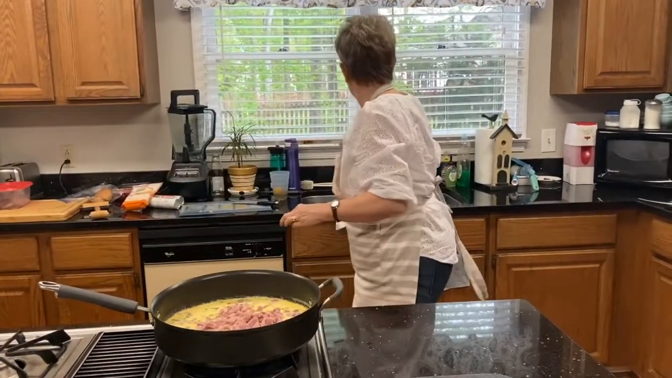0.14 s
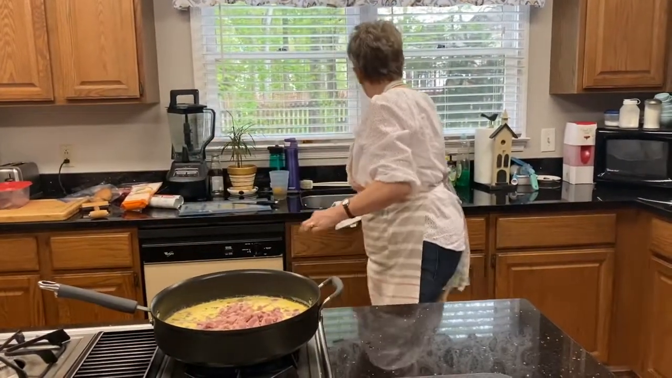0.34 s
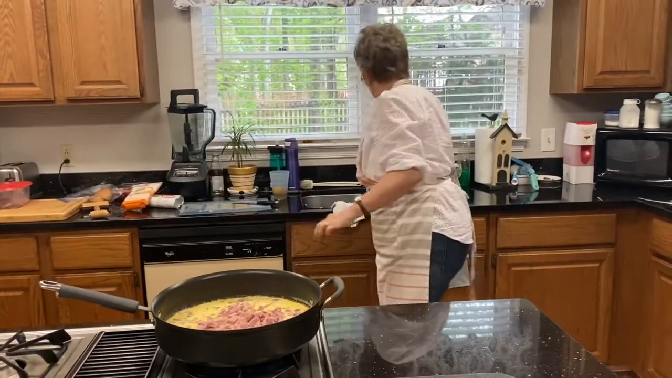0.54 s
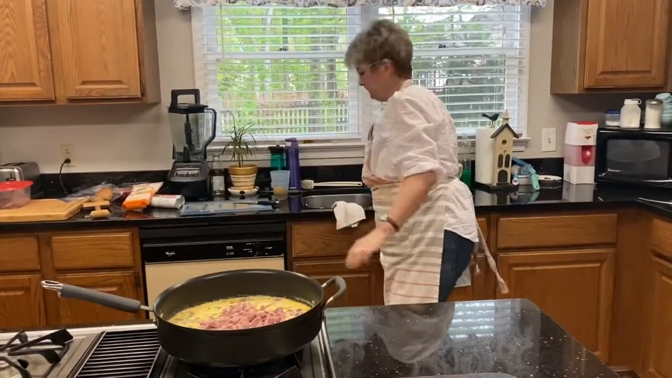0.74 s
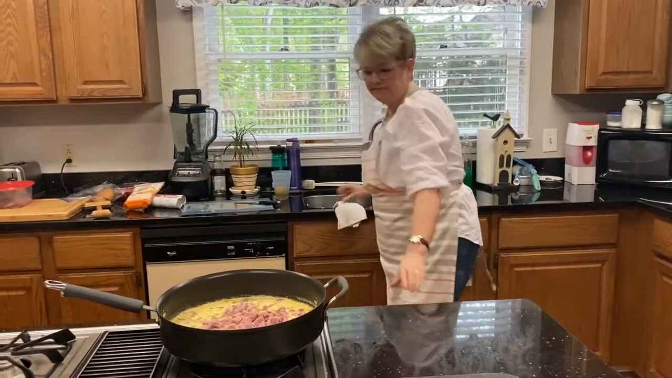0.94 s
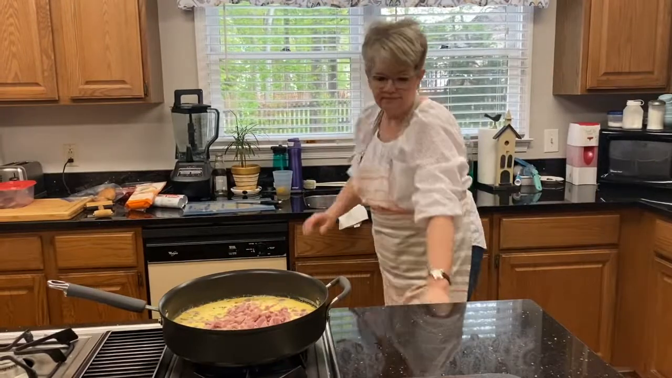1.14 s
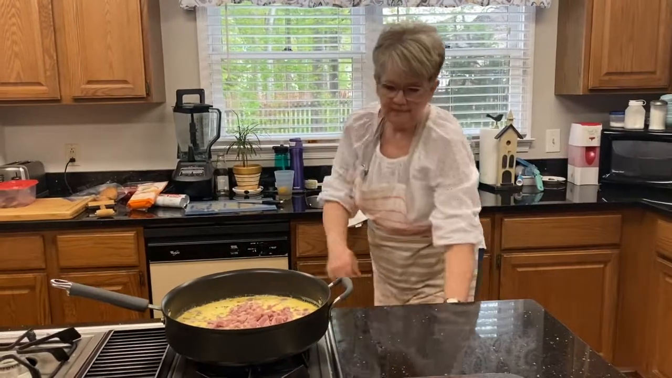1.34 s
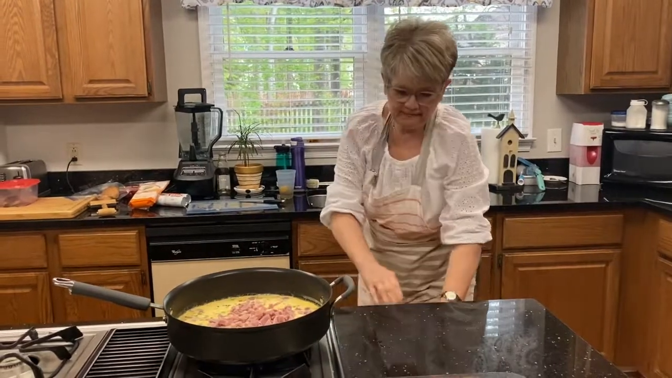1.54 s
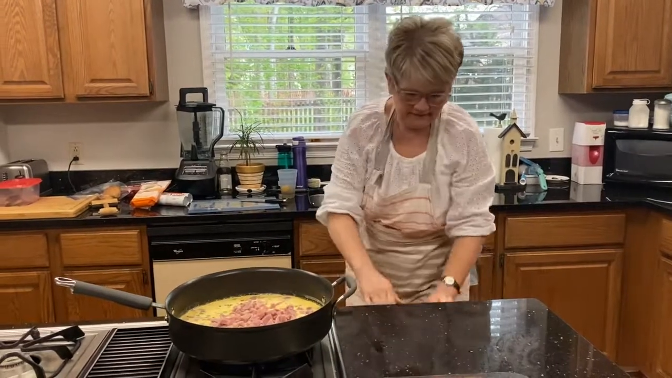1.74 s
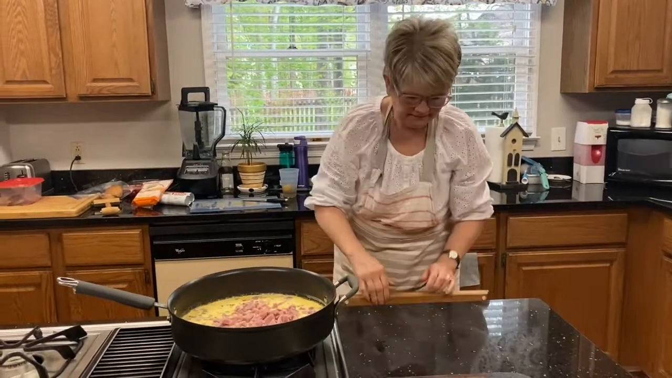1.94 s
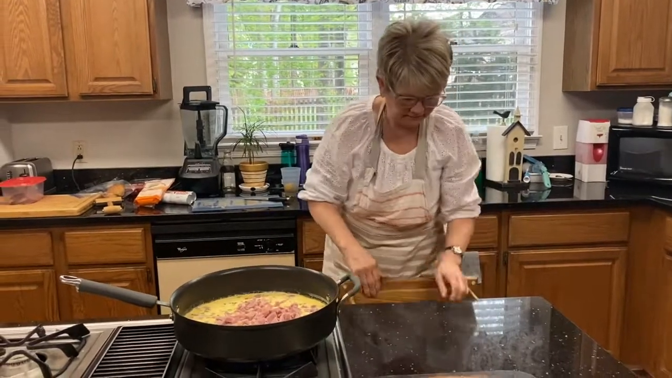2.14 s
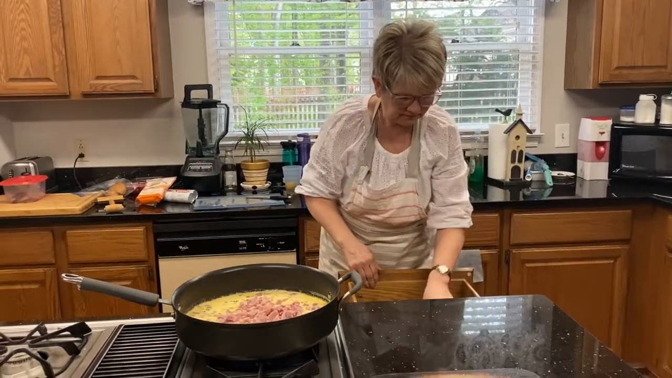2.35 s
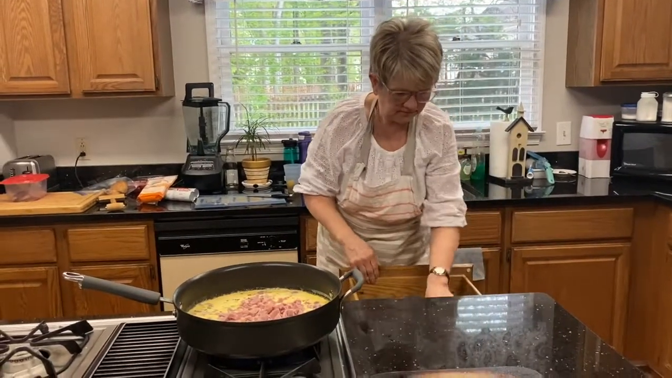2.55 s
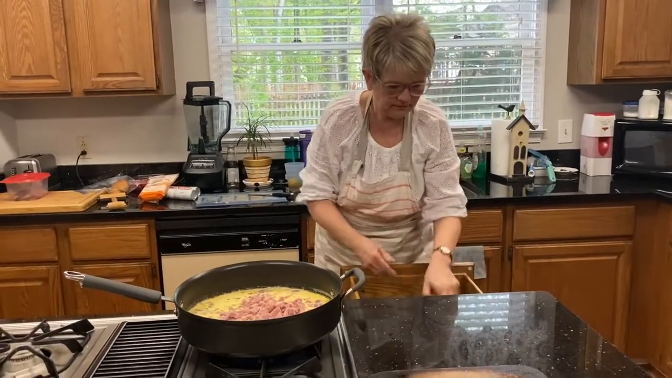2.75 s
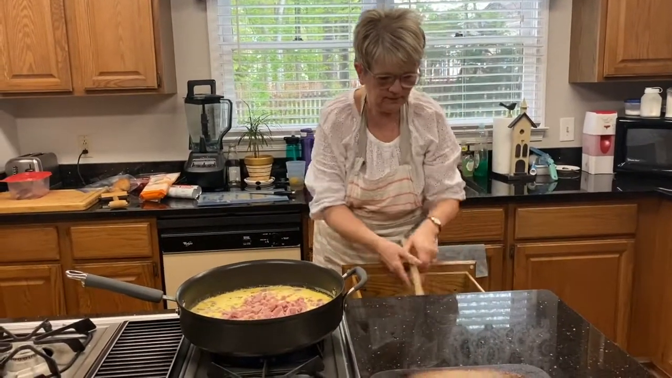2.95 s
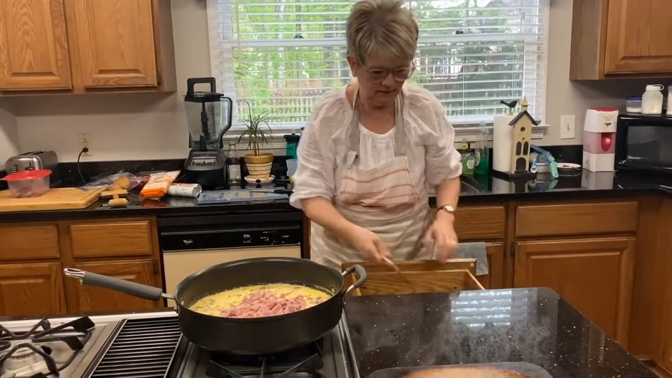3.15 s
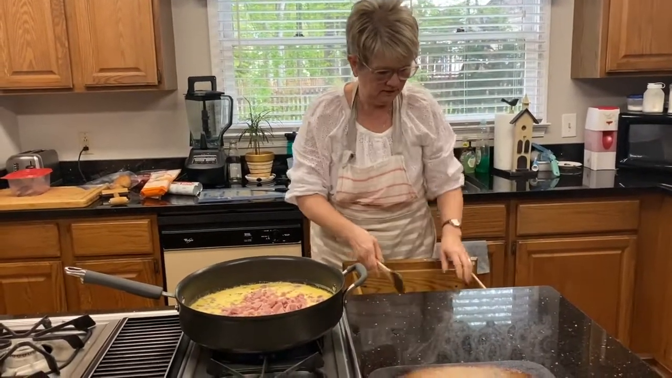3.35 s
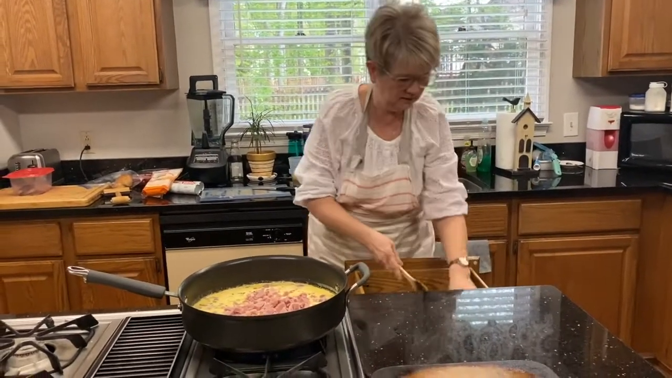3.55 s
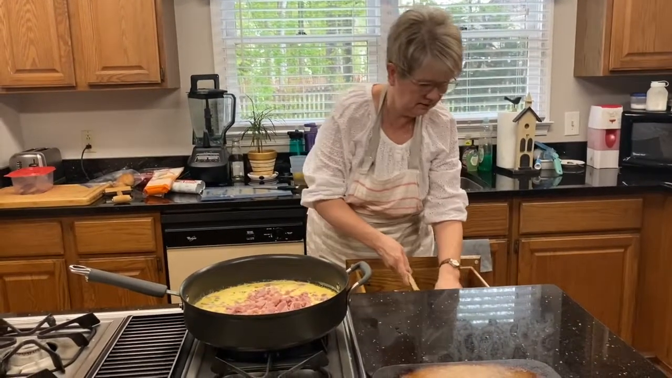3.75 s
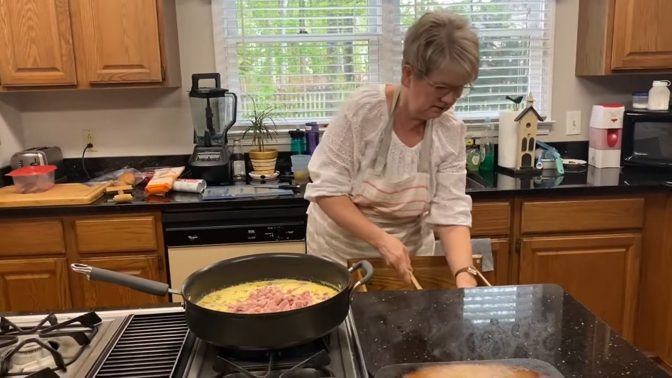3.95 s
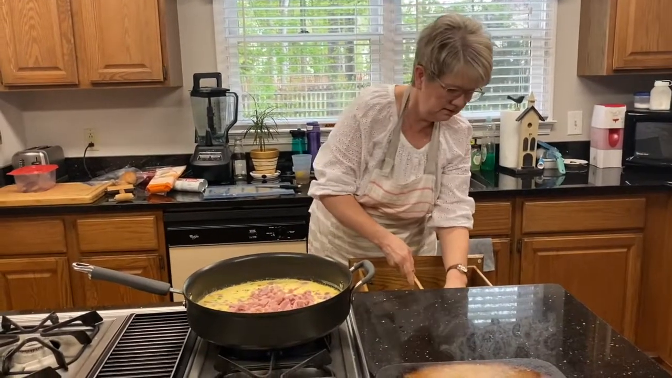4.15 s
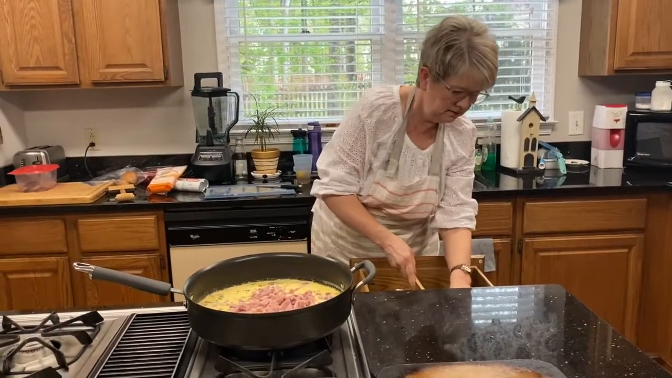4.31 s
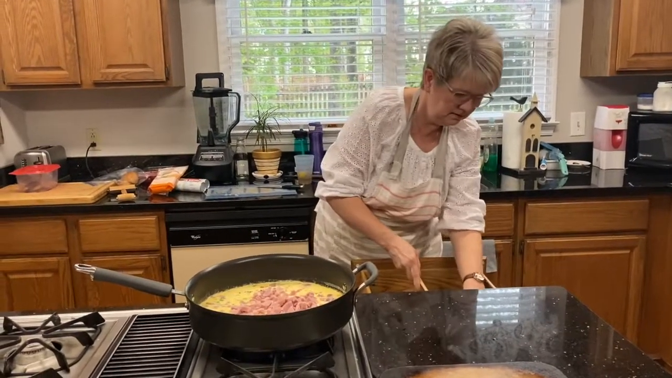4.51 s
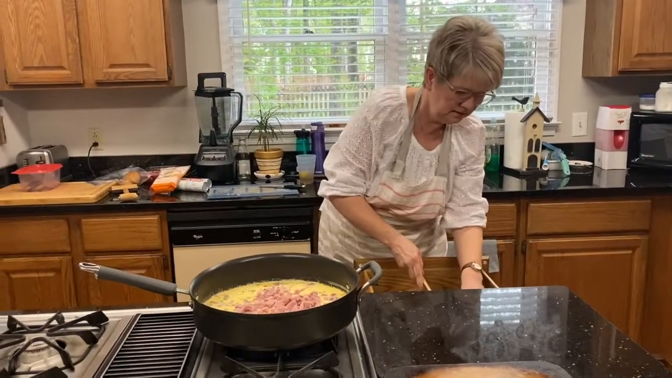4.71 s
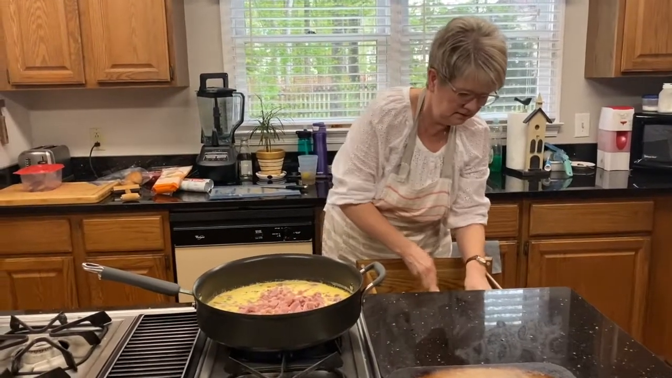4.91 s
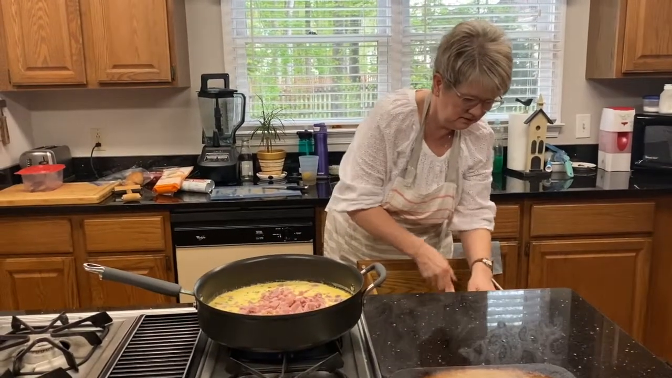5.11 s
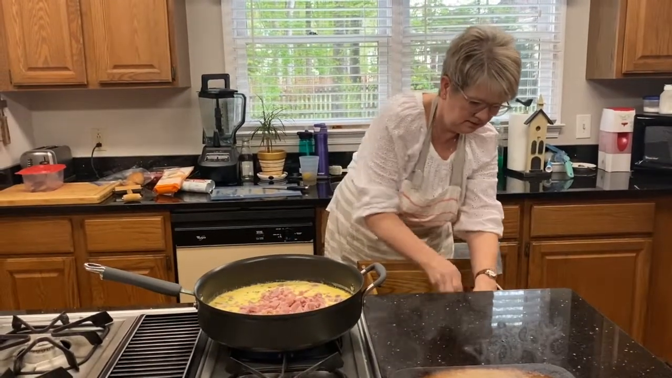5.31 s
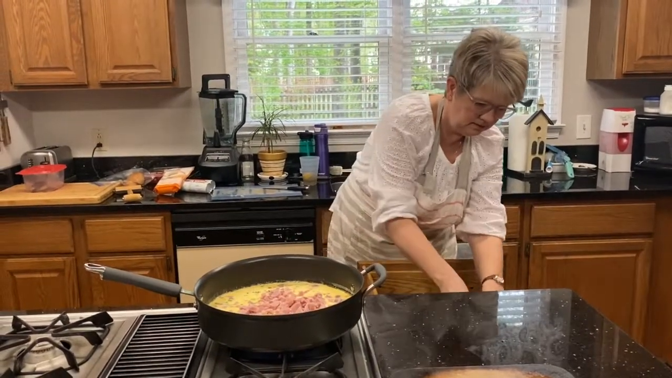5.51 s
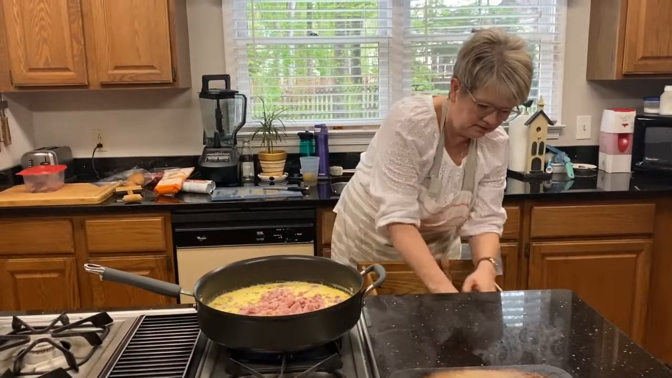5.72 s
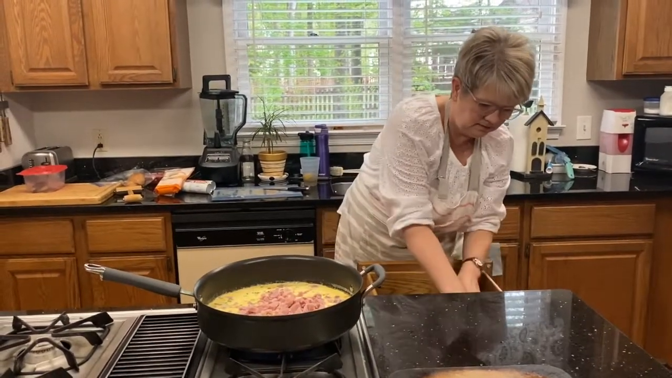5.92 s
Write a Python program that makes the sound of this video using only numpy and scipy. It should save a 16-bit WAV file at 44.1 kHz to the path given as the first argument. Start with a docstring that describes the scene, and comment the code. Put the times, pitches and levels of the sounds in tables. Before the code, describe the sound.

Low airy hum, soft cloth swishes and muffled footfalls for over a second, then a drawer rumbles out on hissing, groaning rollers. Utensils knock loudly, fall nearly quiet, then clatter irregularly to the end, with woody hums as they drag across the hollow drawer bottom. Metal rings are short and dry rather than bell-like. Heard across a hard-walled kitchen, slightly left of centre.

```python
"""Stirring a kitchen drawer

Soft steps and cloth, then a wooden drawer rolls open on hissing, groaning rollers and a hand stirs its
utensils. Random small contacts scrape, jingle and shake the drawer's hollow box; drags make its bottom
panel sing, and single blows crack, ring short metal modes and knock the box. A noise tail gives
the hard-walled room, over filtered noise for a quiet appliance hum.
"""
import sys
import numpy as np
from scipy import signal
from scipy.fft import rfft, irfft, next_fast_len
from scipy.io import wavfile
from scipy.ndimage import uniform_filter1d

SR = 44100
rng = np.random.default_rng(int(sys.argv[2]) if len(sys.argv) > 2 else 0)


def wrap_up_sound(samples):
    """Save the sound to the file named by the first command line argument, as 16-bit audio."""
    columns = np.atleast_2d(samples).T
    # keep every value between -1 and 1, then stretch to whole-number steps
    tamed = np.clip(columns, -1, 1)
    steps = np.round(tamed * 32767).astype(np.int16)
    wavfile.write(sys.argv[1], SR, steps)


N = 267775
T = np.arange(N) / SR  # time in s

# Ringing modes of the metal utensils. Each row: pitch [Hz], time to fall by 60 dB [s].
METAL = [(770, 0.036), (1000, 0.077), (1160, 0.054), (1380, 0.058), (1750, 0.13), (1950, 0.15),
         (2420, 0.02), (2910, 0.13), (3670, 0.043), (4250, 0.023), (4960, 0.059), (6780, 0.026),
         (7400, 0.041), (10600, 0.013)]


def undb(db):
    """Turn dB into gain."""
    return 10 ** (np.asarray(db) / 20)


def unit(x):
    """Scale to rms 1."""
    return x / np.sqrt(np.mean(x ** 2))


def curve(rows):
    """Level in dB over time from (s, dB) points, -120 dB outside them."""
    s, db = np.transpose(rows)
    return np.interp(T, s, db, -120, -120)


def colour(x, points):
    """Filter by a (Hz, dB) spectrum, causally: the cepstrum of the log gain is folded to positive time."""
    hz, db = np.transpose(points)
    grid_hz = np.arange(2049) * SR / 4096
    log_gain = np.interp(np.log(grid_hz + 1), np.log(hz), db) * np.log(10) / 20
    cepstrum = irfft(log_gain)
    cepstrum[1:2048] *= 2
    cepstrum[2049:] = 0
    response = irfft(np.exp(rfft(cepstrum)))
    response = response.reshape((1,) * (x.ndim - 1) + (-1,))
    return signal.fftconvolve(x, response, axes=-1)[..., :x.shape[-1]]


def mode(x, hz, t60):
    """One decaying sine rung by x, peaking near 1 for a unit blow; t60 in s."""
    pole = np.exp(2j * np.pi * hz / SR - np.log(1000) / (t60 * SR))
    return signal.lfilter([1], [1, -pole], x).imag


def width_t60(width_hz):
    """Decay time in s of a resonance of the given width."""
    return np.log(1000) / (np.pi * width_hz)


def band(x, hz, width_hz):
    """A resonance given by its width, at rms 1."""
    return unit(mode(x, hz, width_t60(width_hz)))


def grit(rate, spread_db):
    """Random small contacts, rate per s, of long-tailed size, each a few ms of decaying noise."""
    when, size = rng.random((2, N))
    hits = (when < rate / SR) * undb(-spread_db * np.log(size + 1e-9))
    fade = np.exp(-1 / (0.005 * SR))
    return unit(signal.lfilter([1], [1, -fade], hits) * rng.standard_normal(N))


def walk(rate):
    """Slowly wandering value of rms 1: noise averaged twice over 1 / rate seconds."""
    k = int(SR / rate)
    return unit(uniform_filter1d(uniform_filter1d(rng.standard_normal(N), k), k))


def impulses(s, db):
    """Single-sample pushes at the given times."""
    x = np.zeros(N)
    np.add.at(x, (s * SR).astype(int), undb(db))
    return x


def swells(s, held, db, rise_db, fall_db):
    """Gain of overlapping swells that rise, hold and fall at given dB per s; their powers add."""
    s, held, db = (np.asarray(v)[:, None] for v in (s, held, db))
    t = T[::64]
    rise = rise_db * np.clip(s - t, 0, None)
    fall = fall_db * np.clip(t - s - held, 0, None)
    power = np.sum(undb(db - rise - fall) ** 2, axis=0)
    return np.interp(T, t, np.sqrt(power))


def pair(bass_hz):
    """Two noises that nearly agree in the bass and part above it."""
    mid, side = rng.standard_normal((2, N))
    high = signal.butter(2, bass_hz, "high", fs=SR, output="sos")
    side = undb(-17.0) * side + signal.sosfilt(high, side)
    return mid + side * np.array([[1], [-1]])


def hum():
    """Air and appliances as filtered noise, wavering a little, and the rustle of an apron."""
    # Colour of the air. Each row: frequency [Hz], relative level [dB per Hz].
    air_colour = [(25, 2), (223, 1.5), (326, -5.5), (394, -1), (545, -9.5), (988, -21.5), (1130, -25),
                  (1370, -17), (4500, -26.5), (6800, -26), (16000, -29.5)]
    # Narrow bands of an appliance. Each row: centre [Hz], width [Hz], level [dB].
    whine_bands = [(399, 25, -75), (967, 28, -71.5), (6720, 110, -79.5)]
    # Swishes of cloth. Each row: full strength from [s], held [s], level before flicker [dB].
    swishes = [(0, 0.032, -57), (.15, 0.33, -64.5), (.40, 0.066, -63), (0.748, 0.06, -63.5),
               (.9, 0.066, -67.5), (1.12, 0.28, -62.5)]
    air_db, rise_db_per_s, fall_db_per_s = -61.5, 218, 111
    waver_db, flicker_db = 1.2 * walk(3), 1.5 * walk(25)
    air = undb(air_db + waver_db) * unit(colour(pair(244), air_colour))
    whine = sum(undb(db) * band(pair(1100), hz, width) for hz, width, db in whine_bands)
    cloth = unit(colour(pair(2800), [(300, 27.0), (1500, 12.5), (2900, 10.5), (4500, 7.5),
                                     (12000, 1.5), (16000, -51)]))
    swish = swells(*np.transpose(swishes), rise_db_per_s, fall_db_per_s) * undb(flicker_db)
    return air + whine + swish * cloth


def room(x):
    """Diffuse tail of decaying noise, octave by octave, mostly shorter in the treble."""
    # Decay of the room. Each row: frequency [Hz], time to fall by 60 dB [s], stereo width [dB].
    decay = np.array([(124, 0.66, 10.5), (490, 0.63, 6), (1880, 0.46, 1.5), (6040, 0.44, -0.5),
                      (14200, 0.45, -0.5)])
    t, tail, noise = T[:SR], 0, pair(586)[:, :SR]
    mid = noise.mean(axis=0)
    for hz in 62.5 * 2. ** np.arange(9):
        t60, width_db = (np.interp(np.log(hz), np.log(decay[:, 0]), v) for v in decay.T[1:])
        edges = [hz / np.sqrt(2), min(hz * np.sqrt(2), .45 * SR)]
        octave = signal.butter(2, edges, "band", fs=SR, output="sos")
        spread = mid + undb(width_db) * (noise - mid)
        tail = tail + signal.sosfilt(octave, spread) * undb(-60 * t / t60)
    tail = tail * np.clip(t / 0.00066, 0, 1)  # soft onset
    tail = tail / np.sqrt(np.sum(tail ** 2) / 2)  # mean energy 1 per channel
    return signal.fftconvolve(x[None], tail, axes=1)[:, :N]


def steps():
    """Dull thuds through the floor: each a short push that rings one damped mode."""
    # Soft steps. Each row: time [s], push [dB], pitch [Hz], time to fall by 60 dB [s].
    thuds = [(0.148, -45, 74, 0.14), (0.46, -45.5, 477, 0.085), (0.517, -51, 484, 0.06),
             (0.912, -45, 82.5, 0.16), (1.089, -47, 81, 0.17), (1.111, -46.5, 94.5, 0.16),
             (1.723, -36.5, 79, 0.28)]
    out = 0
    for s, db, hz, t60 in thuds:
        push = uniform_filter1d(impulses(np.array([s]), db), size=40)  # softened over 0.9 ms
        out = out + mode(push, hz, t60)
    return out


def slide():
    """Rollers run along the runners: their bumps shake the loaded drawer and their rub hisses."""
    # The drawer's pull. Each row: time [s], rumble level [dB].
    pull = [(1.48, -68), (1.64, -57), (1.665, -49), (2.04, -48), (2.16, -51), (2.36, -54)]
    # Resonances of the runners. Each row: centre [Hz], width [Hz], relative level [dB].
    runner = [(82, 5.5, -13), (296, 113, 1), (950, 260, -22)]
    # Colour of the roller hiss. Each row: frequency [Hz], relative level [dB per Hz].
    roll = [(300, 6.5), (1500, -3.5), (4000, -10.5), (8000, -20.5), (16000, -34)]
    # the hiss, relative to the rumble, falls steadily and passes 0.5 dB at the third point of the pull
    hiss_db = 0.5 - 14 * (T - pull[2][0])
    bumps, rub = grit(400, 1.8), grit(1200, 1.6)
    body = unit(sum(undb(db) * band(bumps, hz, width) for hz, width, db in runner))
    hiss = undb(hiss_db) * unit(colour(rub, roll))
    return undb(curve(pull)) * (body + hiss)


def groans():
    """Near-pure notes of the rollers that glide to a settling pitch and waver."""
    # Groans. Each row: start [s], length [s], starting pitch [Hz], settling pitch [Hz],
    # level before flutter [dB].
    notes = [(1.66, .075, 250, 290, -48), (1.765, .22, 292, 249, -49), (1.99, .07, 270, 325, -51)]
    settle_s, edge_s = .035, .015
    waver, flutter_db, out = 1 + .008 * walk(30), 1.5 * walk(40), 0
    for s, length, from_hz, to_hz, db in notes:
        glide = np.exp(-np.clip(T - s, 0, None) / settle_s)
        hz = (to_hz + (from_hz - to_hz) * glide) * waver
        gate = np.clip(np.minimum(T - s, s + length - T) / edge_s, 0, 1)
        tone = np.sqrt(2) * np.sin(2 * np.pi * np.cumsum(hz) / SR)
        out = out + undb(db + flutter_db) * gate * tone
    return out


def drags():
    """Stick and slip lock to the bottom panel's note, which bites, sags unevenly and soon dies."""
    # Utensils dragged over the drawer's bottom. Each row: start [s], length [s], level at the bite [dB].
    pulls = [(2.371, 0.059, -43.5), (2.47, 0.058, -38.5), (2.649, 0.05, -41), (2.752, 0.04, -40),
             (2.766, 0.093, -34.5), (3.547, 0.032, -42), (3.626, 0.037, -36.5), (3.697, 0.059, -32.5),
             (3.894, 0.032, -32.5), (3.968, 0.08, -29), (4.044, 0.087, -28.5), (4.204, 0.063, -38.5),
             (4.436, 0.031, -42), (4.542, 0.043, -37.5), (4.678, 0.011, -36.5), (4.854, 0.031, -40.5),
             (4.929, 0.034, -36), (5.008, 0.019, -34), (5.182, 0.036, -50.5), (5.412, 0.03, -51),
             (5.46, 0.024, -30), (5.484, 0.052, -38.5), (5.539, 0.098, -28.5), (5.755, 0.078, -26.5),
             (5.877, 0.059, -29.5), (5.983, 0.068, -42)]
    note_hz, sag_db_per_s = 351.3, 72
    level = sum(undb(db - sag_db_per_s * (T - s)) * ((T > s) & (T < s + length)) for s, length, db in pulls)
    fade = np.exp(-1 / (0.003 * SR))  # 3 ms smoothing of both edges
    level = signal.lfilter([1 - fade], [1, -fade], level) * undb(2.5 * walk(110))
    turn = 2 * np.pi * np.cumsum(note_hz * (1 + .02 * walk(90))) / SR
    return np.sqrt(2) * level * (np.sin(turn) + undb(-15) * np.sin(2 * turn))


def box(x):
    """The drawer's panels and hollow as ringing modes, with the deep bass cut away."""
    # Modes of the box. Each row: pitch [Hz], relative level [dB], time to fall by 60 dB [s].
    panels = [(177.8, -9.5, 0.12), (266, -6.5, 0.041), (360, 0, 0.11), (507.2, 1, 0.026),
              (664, -6.5, 0.042)]
    ring = sum(undb(db) * mode(x, hz, t60) for hz, db, t60 in panels)
    return signal.sosfilt(signal.butter(4, 180, "high", fs=SR, output="sos"), ring)


def clatter():
    """Each metal mode is knocked at its own random moments, so short rings come and go; higher is weaker."""
    rings = sum(undb(-6.5 * np.log2(hz / 1000)) * unit(mode(grit(30, 1.46), hz, t60)) for hz, t60 in METAL)
    return unit(rings)


def stir():
    """Sliding utensils shake the box and the cabinet, clatter, scrape and jingle."""
    # Strokes of the hand. Each row: full strength from [s], held [s], scrape level [dB],
    # bright jingle relative to the scrape [dB].
    strokes = [(2.37, 0.015, -56.5, -11.5), (2.446, 0.0071, -44.5, -22), (2.514, 0.012, -35, -16.5),
               (2.665, 0.044, -52.5, -8), (2.776, 0.0028, -39.5, -15), (3.56, 0.13, -40.5, -11.5),
               (3.655, 0.064, -37, -14), (3.718, 0.0084, -30, -11), (3.911, 0.16, -44, -4),
               (3.988, 0.17, -38, -13.5), (4.088, 0.061, -35, -19), (4.21, 0.088, -48, -13),
               (4.373, 0.017, -45.5, -17), (4.45, 0.022, -39.5, -22), (4.563, 0.0067, -42.5, -30),
               (4.641, 0.044, -43, -6.5), (4.759, 0.04, -42, -11), (4.87, 0.017, -46, -15),
               (4.945, 0.058, -43.5, -10), (5.185, 0.0088, -53.5, -13.5), (5.29, 0.066, -67, -3.5),
               (5.409, 0.011, -55, -32), (5.474, 0.0052, -44, -12.5), (5.559, 0.15, -38.5, -17),
               (5.784, 0.0052, -32, -30), (5.918, 0.039, -33, -12), (6.0, 0.02, -33, -16)]
    # Colours of scrape and jingle. Each row: frequency [Hz], relative level [dB per Hz].
    scrape_colour = [(100, -60.5), (170, -6), (500, -2), (1100, -3), (2200, -6), (4500, -13.5), (7000, -36)]
    jingle_colour = [(2500, -40), (5000, 10.5), (11000, 2), (16000, -11.5)]
    rise_db_per_s, fall_db_per_s = 508, 156.5
    settle_db, settle_fall_db_per_s = -14, 60  # the heap keeps shifting softly after a stroke
    cabinet_db, clatter_db = -21, -6.5  # relative to the scrape
    s, held, db, jingle_db = np.transpose(strokes)

    def stroke(level_db):
        """Gain of the strokes with their slower settling."""
        main = swells(s, held, level_db, rise_db_per_s, fall_db_per_s)
        settling = swells(s, held, level_db + settle_db, rise_db_per_s, settle_fall_db_per_s)
        return np.hypot(main, settling)

    # dull and sharp contacts come independently
    dull, sharp, tiny = grit(500, 1.5), grit(700, 1.3), grit(300, 1.8)
    low = signal.sosfilt(signal.butter(2, 1500, fs=SR, output="sos"), dull)
    high = signal.sosfilt(signal.butter(2, 1500, "high", fs=SR, output="sos"), sharp)
    shake = unit(box(dull))
    scrape = unit(colour(low + high, scrape_colour))
    jingle = unit(colour(tiny, jingle_colour))
    cabinet = undb(cabinet_db) * band(dull, 96, 28)
    heap = shake + scrape + cabinet + undb(clatter_db) * clatter()
    return stroke(db) * heap + stroke(db + jingle_db) * jingle


def blows():
    """Each blow: chatter cracks around its pitch; its first tap rings nearby metal modes and knocks the box."""
    # Utensil blows. Each row: time [s], reference level [dB], pitch struck [Hz],
    # peak of the ring relative to that level [dB].
    hits = [(1.656, -40, 975, -2), (1.681, -37, 4200, -25), (1.87, -41.5, 4250, -12),
            (2.122, -43.5, 6500, -28), (2.428, -33, 2980, -18), (2.443, -33, 1150, 2),
            (2.495, -12.5, 2730, -23), (2.508, -17.5, 2940, -29), (2.651, -27.5, 1000, -6.5),
            (2.753, -27.5, 1600, -16), (2.775, -36.5, 2950, -5), (2.874, -29.5, 920, -18),
            (3.459, -43, 860, -26), (3.546, -28.5, 1570, 0), (3.632, -14.5, 1890, -18),
            (3.641, -18.5, 1170, -1.5), (3.694, -34, 1900, -15), (3.893, -23, 1810, -30),
            (3.977, -43, 4250, 6), (4.011, -37, 990, 10), (4.07, -18, 2900, -8), (4.107, -22.5, 6650, -6),
            (4.202, -23.5, 2000, -11), (4.344, -30.5, 1760, -11), (4.347, -41, 4300, 1.5),
            (4.411, -27.5, 980, -26), (4.447, -19.5, 1960, -16), (4.55, -28, 2260, -4),
            (4.652, -31, 3980, -17), (4.748, -29.5, 4030, -18), (4.8, -39, 3670, 2),
            (4.977, -32, 5100, -11), (5.46, -27, 3230, -19), (5.542, -24.5, 3560, -21),
            (5.579, -25, 2000, -4), (5.626, -29, 2550, 3.5), (5.752, -26.5, 4020, 2),
            (5.772, -34, 3670, 11.5), (5.778, -19, 1660, -12), (5.783, -33, 990, -2),
            (5.934, -25.5, 1230, 0), (5.936, -24, 770, -3), (5.973, -21.5, 4900, -7)]
    t, out = T[:SR // 5], np.zeros(N + SR)
    chance = rng.standard_normal((len(hits), len(t)))
    # the box feels the push of the contact, 0.1 ms long, not its fine chatter
    knock = box(np.sin(np.pi * np.clip(t / 0.0001, 0, 1)))
    for (s, db, struck_hz, ring_db), noise in zip(hits, chance):
        chatter = noise * (1 - np.exp(-t / 0.0009)) * np.exp(-t / 0.007)
        tap = noise * np.exp(-t / 0.0012)
        crack = colour(chatter, [(struck_hz / 8, -34), (struck_hz / 2, -4), (struck_hz, 0),
                                 (struck_hz * 2, -9), (16000, -36)])
        # modes weaken by 60 dB per octave away from the pitch struck
        ring = sum(undb(-60 * abs(np.log2(hz / struck_hz))) * mode(tap, hz, t60) for hz, t60 in METAL)
        parts = ((crack, -4), (ring, ring_db), (knock, -16))
        start = int(s * SR)
        out[start:start + len(t)] += sum(undb(db + d) * v / np.max(np.abs(v)) for v, d in parts)
    return out[:N]


def scene():
    """Drawer and steps, direct and through the room, over the hum."""
    room_db = -1
    direct = stir() + slide() + groans() + steps() + blows() + drags()
    # the drawer lies a little to the left; the right side hears it duller
    sides = np.array([direct, colour(direct, [(900, 0.0), (2500, -4.0)])])
    return sides + undb(room_db) * room(direct) + hum()


def record(dry):
    """High up, both channels share the left's signal, their phases parting in soft steps; bass and top are cut."""
    # Where the phase starts to turn [Hz], and the span of each half turn [Hz].
    turn_from_hz, half_turn_hz = (6950, 2120)
    share_from_hz, share_fade_hz, bass_hz, top_hz = 7750, 600, 45, 15800
    size = next_fast_len(N)
    hz, spec = np.arange(size // 2 + 1) * SR / size, rfft(dry, size)
    turn = np.pi * (hz - turn_from_hz) / half_turn_hz
    lag = turn - np.sin(2 * turn) / 2
    shared = spec[0] * np.exp(np.array([[-.5j], [.5j]]) * lag)
    share = np.clip((hz - share_from_hz) / share_fade_hz, 0, 1)
    out = irfft(spec * (1 - share) + shared * share, size)[:, :N]
    out = signal.sosfilt(signal.butter(3, bass_hz, "high", fs=SR, output="sos"), out)
    return signal.sosfilt(signal.ellip(10, .2, 80, top_hz, fs=SR, output="sos"), out)


dry = scene()
out = record(dry)
wrap_up_sound(out)
```